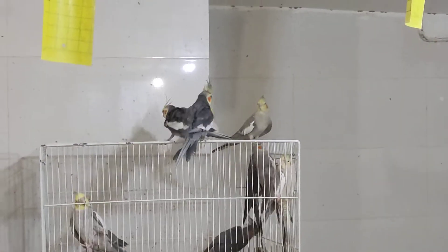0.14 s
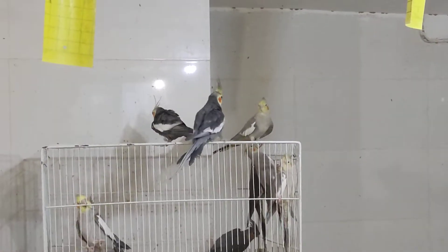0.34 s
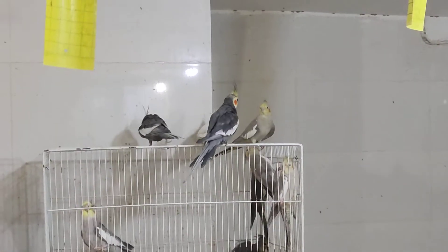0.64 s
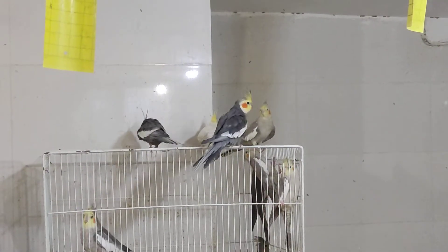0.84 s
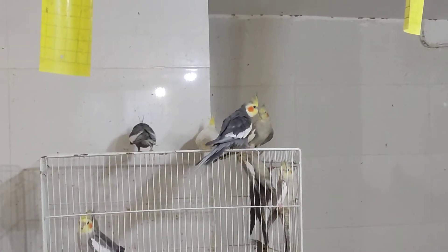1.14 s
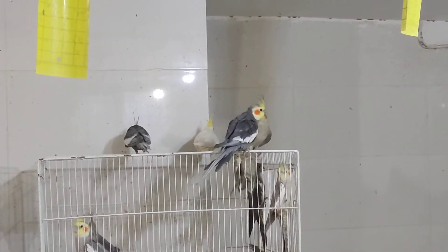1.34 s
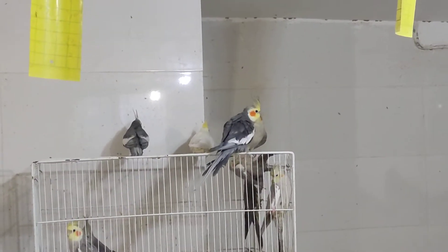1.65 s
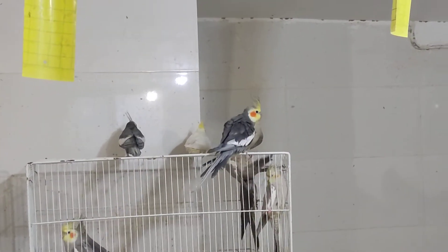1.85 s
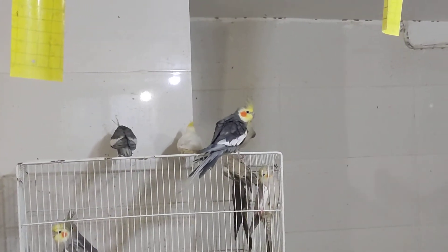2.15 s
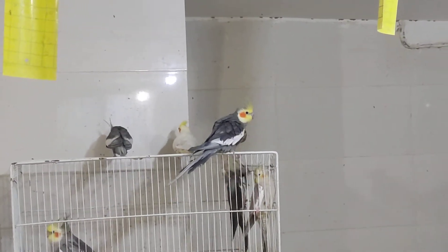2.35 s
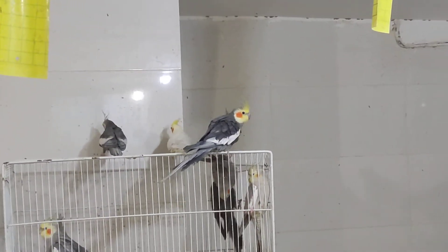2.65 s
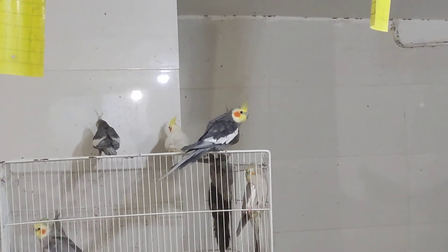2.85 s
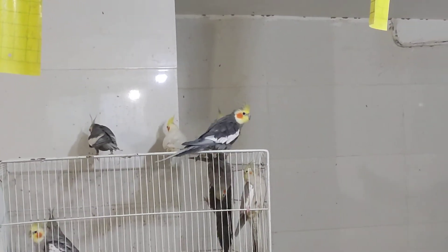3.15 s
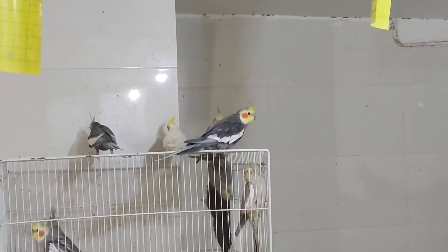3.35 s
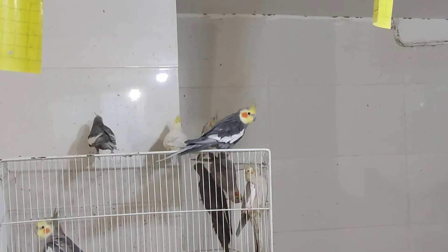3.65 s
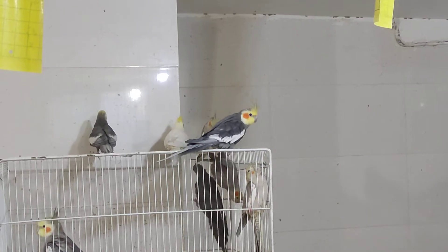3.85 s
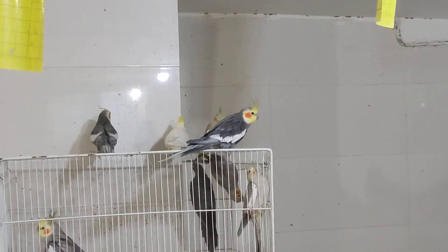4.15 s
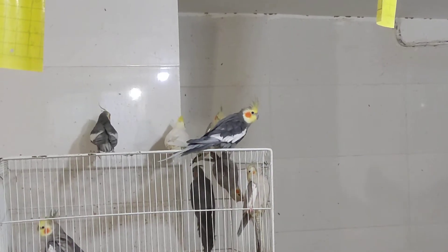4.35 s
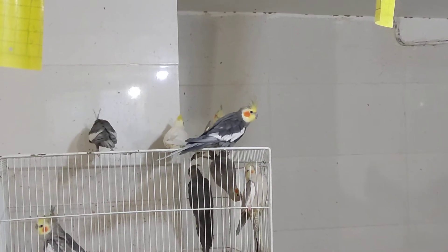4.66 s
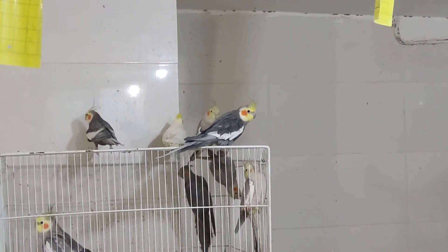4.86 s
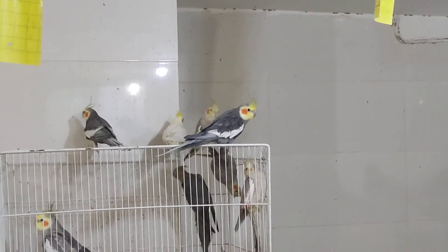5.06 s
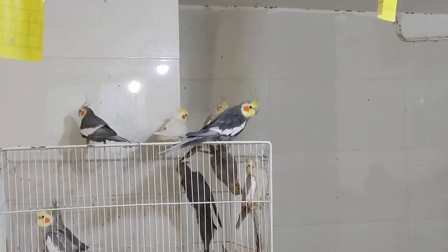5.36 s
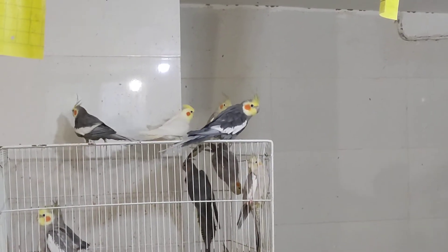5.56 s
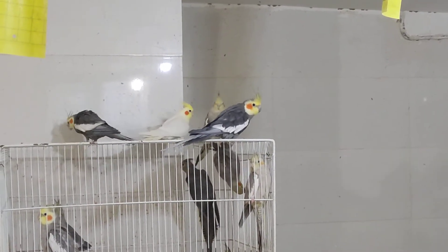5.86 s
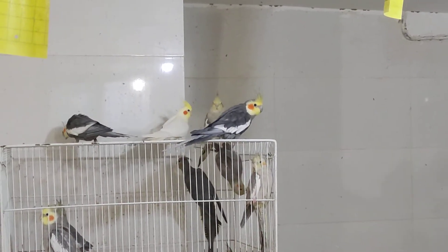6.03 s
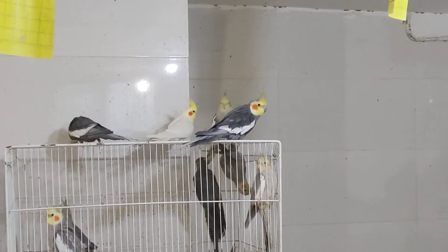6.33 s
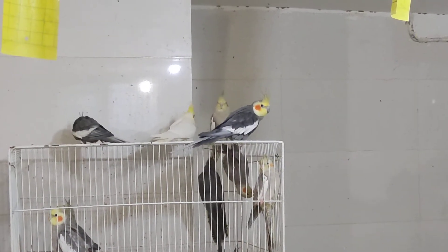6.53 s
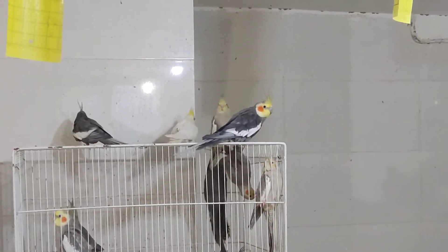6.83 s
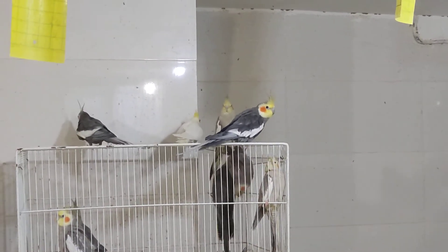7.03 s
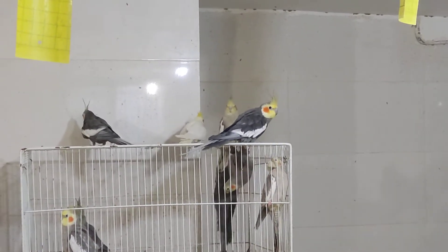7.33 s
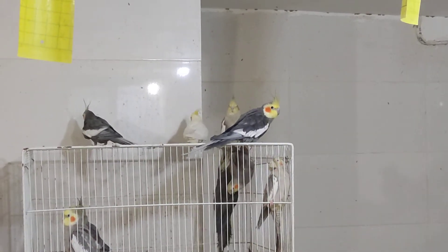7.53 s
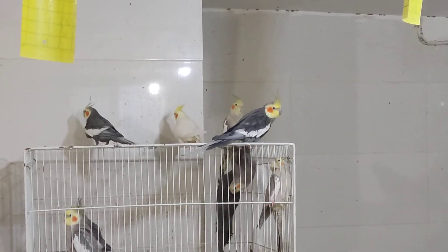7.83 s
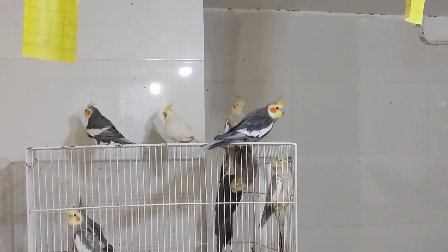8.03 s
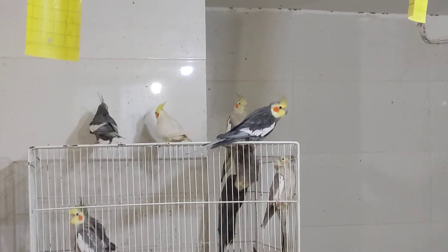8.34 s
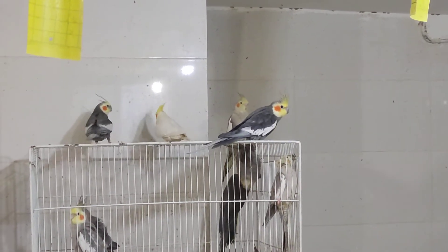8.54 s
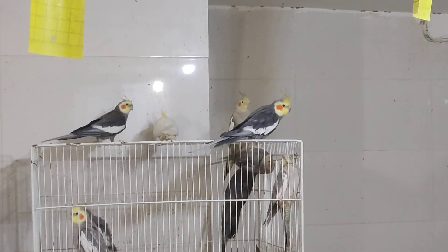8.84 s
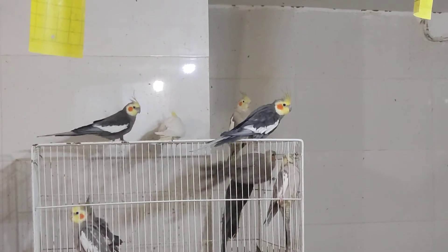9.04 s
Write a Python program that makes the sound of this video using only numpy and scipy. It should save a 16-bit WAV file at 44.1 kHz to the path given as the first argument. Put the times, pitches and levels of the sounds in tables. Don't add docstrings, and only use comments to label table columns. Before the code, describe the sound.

Small parrots rustle and tick on cage wire, then whistle and shriek in short bursts, ringing off bare tiles above a steady low fan.

```python
import sys
import numpy as np
from scipy import signal
from scipy.fft import rfft, irfft, next_fast_len
from scipy.io import wavfile
from scipy.ndimage import uniform_filter1d

SR = 44100
rng = np.random.default_rng(int(sys.argv[2]) if len(sys.argv) > 2 else 0)


def decibels_to_gain(level_db):
    exponent = np.asarray(level_db, float) / 20
    return 10 ** exponent


def waveform_to_disk(signal):
    frames = np.transpose(np.atleast_2d(signal))
    scaled = np.clip(frames, -1, 1) * 32767
    samples = np.round(scaled).astype(np.int16)
    wavfile.write(sys.argv[1], SR, samples)


N = 405279
PORT_GAP_S = 20 / 44100
SNAP = signal.butter(2, [5000, 13500], "bandpass", fs=SR, output="sos")
BODY = signal.butter(2, [2000, 6000], "bandpass", fs=SR, output="sos")


def curve(points, hz):
    f, value = np.transpose(points)
    return np.interp(np.log(hz + 1), np.log(f), value)


def level(x, db):
    return x * decibels_to_gain(db) / np.sqrt(np.mean(x ** 2))


def walk(rate, size):
    hold = max(int(SR / rate), 1)
    steps = np.repeat(rng.standard_normal(size // hold + 1), hold)
    return 1.373 * uniform_filter1d(uniform_filter1d(steps, hold), hold)[:size]


def add(out, x, s):
    i = int(s * SR)
    out[..., i:i + x.shape[-1]] += x[..., :max(N - i, 0)]


def diffuse(size, lead_s=0.0):
    hz = np.fft.rfftfreq(size, 1 / SR)
    a, b = rfft(rng.standard_normal((2, size)))
    alike = np.sinc(2 * hz * PORT_GAP_S)
    alike = alike * (1 - np.exp(-hz / 28.0))
    left = a * np.exp(-2j * np.pi * hz * lead_s)
    return hz, np.array([left, alike * a + np.sqrt(1 - alike ** 2) * b])


# frequency in Hz, density in dB per Hz.
AIR = [(13, -51.5), (22, -9), (38, -16), (51, -15), (70, -25), (103, -5), (124, -8), (142, -4.5), (171, -8),
       (264, -8.5), (1530, -23.5), (2620, -27.5), (6400, -33), (8850, -37.5), (14000, -43.5)]
# frequency in Hz, width in Hz, lift in dB.
AIR_LIFTS = [(666, 21, 7), (2500, 810, 7.5)]
# frequency in Hz, width in Hz, level in dB.
HUM = [(70.8, 7.6, -49.5), (139.3, 3.23, -42.5), (144.8, 2.78, -45), (228, 12.4, -54), (417, 8.12, -53)]


def fan():
    size = next_fast_len(N)
    hz, spec = diffuse(size, lead_s=0.00023)
    lift_db = sum(db / (1 + (2 * (hz - f) / width) ** 2) for f, width, db in AIR_LIFTS)
    air = level(irfft(spec * decibels_to_gain(curve(AIR, hz) + lift_db), size)[:, :N], -39)
    motor = 0
    for f, width, db in HUM:
        phase = 2 * np.pi * np.cumsum(f + 0.2967 * width * walk(4, N)) / SR
        motor = motor + level(np.sin(phase) * decibels_to_gain(2.2 * walk(8, N)), db)
    left_motor = np.roll(motor, int(PORT_GAP_S * SR))
    return air * decibels_to_gain(0.5 * walk(0.81, N)) + np.array([left_motor, motor])


# frequency in Hz, time to fall 60 dB in seconds.
ROOM_T60 = [(1500, 0.58), (2500, 0.56), (3400, 0.5), (4600, 0.52), (6500, 0.38), (9000, 0.26),
            (13000, 0.31)]


def room(x, lag_s, wet_db=0.0, gap_s=0.0045, build_s=0.0056):
    size = SR
    hz, spec = diffuse(size)
    t = np.arange(size) / SR
    wash = 0
    for k, (_, t60) in enumerate(ROOM_T60):
        share = curve([(f, float(j == k)) for j, (f, _) in enumerate(ROOM_T60)], hz)
        wash = wash + irfft(spec * share, size) * decibels_to_gain(-60 * t / t60)
    near_walls = 1 + 0.27 * np.exp(-t / 0.098)
    wash = wash * np.clip((t - gap_s) / build_s, 0, 1) * near_walls
    wash = wash * decibels_to_gain(wet_db) / np.sqrt(np.sum(wash ** 2) / 2)
    wash[0, int(max(lag_s, 0) * SR)] += 1
    wash[1, int(max(-lag_s, 0) * SR)] += 1
    return signal.fftconvolve(x[None], wash, axes=1)


# start in seconds, length in seconds, level in dB.
BOUTS = [(0.0, .3, -42.5), (0.606, .06, -42), (2.01, .1, -39.5), (2.416, .2, -46.5), (3.4, .05, -59),
         (4.53, .06, -45), (4.98, .05, -51.5), (6.347, 0.18, -48.5), (7.243, .25, -45.5)]


def stir_db():
    t = np.arange(N) / SR
    db = np.maximum(-43.5 - 4.5 * t, -56.5)
    for s, length, bout_db in BOUTS:
        swell = 78 * (s - t)
        calm = 37.5 * (t - s - length)
        db = np.maximum(db, bout_db - np.maximum(np.maximum(swell, calm), 0))
    return db


def feathers():
    out = 0
    stir = decibels_to_gain(stir_db())
    for perch in range(4):
        grains = rng.standard_normal(N) * decibels_to_gain(2.5 * rng.exponential(size=N) + 2.5 * walk(40, N))
        grains = level(signal.sosfilt(SNAP, grains), -17.5) + level(signal.sosfilt(BODY, grains), -20.5)
        out = out + room(grains * stir, lag_s=PORT_GAP_S * perch / 3, wet_db=9.5)
    return out[:, :N]


# time in seconds, peak in dB, body minus tick in dB.
TICKS = [(0.203, -28.5, -10.5), (0.3025, -26.5, -18), (0.6457, -28.5, -14.5), (1.355, -36.5, -7),
         (1.5763, -41, -6), (3.4012, -35.5, -9), (4.3779, -40, -11), (4.5177, -28, -26), (4.5266, -32, -5),
         (4.6598, -38, -10), (5.7222, -38.5, -16), (6.3644, -49, -7), (6.463, -36, -18), (7.175, -33, -32),
         (7.272, -30, -8), (7.3125, -12, -12), (7.3234, -43.5, -24), (7.4478, -21, -44),
         (7.511, -27, -11.5), (7.5462, -28.5, -15)]


def wire_ticks():
    dry, t = np.zeros(N), np.arange(600) / SR
    for s, db, body_db in TICKS:
        burst = rng.standard_normal(600) * t / 0.0015 * np.exp(-t / 0.0013)
        tick = signal.sosfilt(SNAP, burst) + decibels_to_gain(body_db + 9.5) * signal.sosfilt(BODY, burst)
        add(dry, decibels_to_gain(db + 7.5) * tick, s - 0.0005)
    return room(dry, lag_s=PORT_GAP_S, wet_db=6.5, gap_s=0.00062)[:, :N]


def whistle(table, flutter_db=0.5, fall_db=-3.5, rasp_db=-5.0, rattle_db=-0.5):
    s, *columns = np.transpose(table)
    t = s[0] + np.arange(int(0.36 * SR)) / SR
    size = len(t)
    hz, effort_db, second_db, high_db = (uniform_filter1d(np.interp(t, s, c), size=130) for c in columns)
    slide = np.clip(np.abs(np.gradient(np.log(hz))) * SR / 12, 0, 1)
    jitter = (0.005 + 0.04 * slide) * walk(400, size) + 0.005 * walk(90, size)
    phase = 2 * np.pi * np.cumsum(hz * (1 + jitter)) / SR
    tone = np.sin(phase) * decibels_to_gain(3 * slide * walk(600, size))
    tone += decibels_to_gain(second_db + (1.5 + 2.5 * slide) * walk(600, size)) * np.sin(2 * phase)
    for k in range(3, 9):
        partial_db = high_db + fall_db * (k - 2) + 2.9 * walk(700, size)
        tone += decibels_to_gain(partial_db) * np.sin(k * phase) * (k * hz < 15000)
    breath_band = signal.butter(2, [4500, 11000], "bandpass", fs=SR, output="sos")
    breath = signal.sosfilt(breath_band, rng.standard_normal(size))
    tone += decibels_to_gain(high_db + rasp_db) * breath * (1 + np.cos(phase))
    rattle_band = signal.butter(3, [1500, 3200], "bandpass", fs=SR, output="sos")
    rattle = signal.sosfilt(rattle_band, rng.standard_normal(size))
    tone += (decibels_to_gain(high_db + rattle_db) + decibels_to_gain(-21)) * rattle
    edges = np.clip(np.minimum(t - s[0], s[-1] - t) / 0.00077, 0, 1)
    return np.sqrt(2) * tone * edges * decibels_to_gain(effort_db + flutter_db * walk(149.5, size))


# pitch in Hz, level over the note in dB.
SECOND = [(1500, -6), (1800, 9), (2100, -2.5), (2400, -10.5), (3000, -20.5), (3400, -15.5)]
# pitch in Hz, level over the note in dB.
HIGH = [(1500, -2), (1800, -2.5), (2100, -7), (2400, -18.5), (3000, -20.5), (3400, -36)]


def voiced(tune, second_db=0.0, high_db=0.0):
    s, hz = np.array(tune)[:, :2].T
    tight_hz, slack_hz = 2980, 2060
    slack = np.clip((tight_hz - hz) / (tight_hz - slack_hz), 0, 1)
    tire_db = -6.5 * (s - s[0]) / (s[-1] - s[0])
    return np.column_stack([tune, curve(SECOND, hz) + second_db * slack, curve(HIGH, hz) + high_db + tire_db])


# time in seconds, pitch in Hz, effort in dB.
NASAL = [(2.0, 1548, -40), (2.02, 1680, -41.5), (2.08, 1813, -36.5), (2.125, 2016, -31),
         (2.15, 2267, -23.5), (2.21, 2416, -25.5), (2.26, 2295, -26.5), (2.31, 2020, -38)]
DOUBLE = [(2.75, 1442, -42.5), (2.79, 1997, -25), (2.83, 2890, -29), (2.85, 2850, -26), (2.87, 1930, -31),
          (2.89, 1880, -35.5), (2.925, 3015, -16), (2.955, 3130, -63)]
LONG = [(5.005, 1775, -29.5), (5.05, 2188, -25), (5.1, 2856, -15), (5.15, 3064, -15), (5.21, 3084, -15),
        (5.28, 2883, -19.5), (5.33, 2833, -18.5), (5.35, 2693, -15)]
UNDER = [(5.15, 1916, -19.5), (5.17, 1606, -36), (5.2, 2030, -23.5), (5.225, 2400, -20.5),
         (5.25, 1890, -33), (5.29, 1770, -45)]
CRACKED = [(5.925, 1287, -43), (5.95, 1556, -35), (5.985, 1860, -32), (6.0, 2743, -32.5), (6.05, 2900, -34),
           (6.08, 2780, -33)]
PIPED = [(6.16, 2820, -21.5), (6.18, 2943, -21), (6.22, 3050, -26), (6.285, 2898, -31)]
LOUD = [(8.153, 1780, -38), (8.16, 2020, -21), (8.175, 2147, -23.5), (8.185, 2605, -19.5),
        (8.197, 3184, -13.5), (8.22, 3447, -11.5), (8.27, 3250, -11.5), (8.295, 2995, -21),
        (8.315, 2500, -23)]
FALLING = [(8.848, 1663, -25.5), (8.87, 1833, -30.5), (8.89, 2232, -17), (8.907, 2840, -12),
           (8.97, 3057, -20.5), (9.04, 2977, -13), (9.07, 2270, -21), (9.1, 1762, -38.5), (9.16, 1708, -38)]
# tune, its second partial in dB, its higher partials in dB.
TUNES = [(NASAL, 4.1, 0.9), (LONG, -8, 0.833), (PIPED, -1, -1.4), (DOUBLE, -8.5, 0.5),
         (UNDER, -7.5, -0.3), (CRACKED, 2.273, 0.88), (FALLING, -7, -1.9), (LOUD, 7.7, 4.7)]


def tuned_calls():
    return [voiced(*tune) for tune in TUNES]


# start in seconds, climb in seconds, hold in seconds, top in Hz, effort in dB.
SHARP = [(3.432, .028, .105, 3400, -15), (5.328, .022, .11, 3300, -15)]
DRAWN = [(6.525, .088, .095, 3410, -21), (8.505, .068, .08, 3320, -18.5)]
# place of the top from 0 to 1, start in Hz, break in Hz; start, mid-climb, break,
# drop and end effort in dB under the hold; second and higher partials in dB.
SHARP_MANNER = (0.9, 1595, 2249.5, -24, -9.5, -4, -10, -29, 5, 2)
DRAWN_MANNER = (0.6, 1851, 2498.5, -13.5, -2, -2, -6, -16, -5, 0.4)


def shriek(row, manner):
    s, climb, hold, top, db = row
    place, start_hz, break_hz, start, mid, brk, drop, end, second_db, high_db = manner
    jump_s, drop_s, tail_s = 0.018, 0.016, 0.035
    lengths = [0, climb / 2, climb / 2, jump_s, place * hold, (1 - place) * hold, drop_s, tail_s]
    hz = [start_hz, (start_hz + break_hz) / 2, break_hz, 0.93 * top, top, 0.95 * top, 2454, 1891]
    effort_db = db + np.array([start, mid, brk, 0, 0, 0, drop, end])
    return voiced(np.transpose([s + np.cumsum(lengths), hz, effort_db]), second_db, high_db)


# start in seconds, rise in seconds, sag in seconds, top in Hz, effort in dB.
CHIRPS = [(6.02, 0.15, 0.015, 2388, -27), (6.561, .12, 0.013, 2224, -35.5), (7.681, .11, 0.1, 2573, -30.5),
          (7.975, 0.082, 0.045, 2414, -27.5)]


def chirp(s, rise, sag, top, db):
    times = s + np.array([0, 0.45 * rise, 0.72 * rise, rise, rise + 0.65 * sag, rise + sag])
    dwell_hz = 1518
    hz = [dwell_hz, 1.07 * dwell_hz, 0.82 * top, top, 0.87 * top, 0.54 * top]
    effort_db = db + np.array([-6, -6, 0, -1, -1, -6])
    return voiced(np.transpose([times, hz, effort_db]), second_db=-8, high_db=-3.5)


def birds():
    out = np.zeros((2, N))
    calls = tuned_calls()
    calls += [shriek(row, SHARP_MANNER) for row in SHARP]
    calls += [shriek(row, DRAWN_MANNER) for row in DRAWN]
    calls += [chirp(*row) for row in CHIRPS]
    for table in calls:
        lag_s = rng.uniform(0.39, 1) * PORT_GAP_S
        add(out, decibels_to_gain(-6.5) * room(whistle(table), lag_s=lag_s, wet_db=7.0), table[0][0])
    return out


def scene():
    return fan() + feathers() + wire_ticks() + birds()


def mask(x, near_db=-10, slope_db=-6.5, far_db=-46):
    spec = signal.stft(x, nperseg=2048)[2]
    power = np.sum(np.abs(spec[:, :1024]) ** 2, axis=0)
    bands = 10 * np.log10(power.reshape(64, 16, -1).mean(axis=1) + 1e-20)
    hide = np.tile(bands.max(axis=0) + far_db, (64, 1))
    for k in range(1, 4):
        hide[k:] = np.maximum(hide[k:], bands[:-k] + near_db + slope_db * k)
    keep = (bands > hide) | (np.arange(64)[:, None] < 7)
    spec[:, :1024] *= np.repeat(keep, 16, axis=0)
    return signal.istft(spec, nperseg=2048)[1][:, :N]


def band_limit(x):
    return signal.sosfilt(signal.butter(12, 14300, fs=SR, output="sos"), x)


# resonance in Hz, width in Hz, lift in dB, top octave in dB.
PORTS = [(10770, 2250, 8, -0.5), (8700, 2330, 15, -5)]


def record(dry):
    size = next_fast_len(N)
    hz = np.fft.rfftfreq(size, 1 / SR)
    lift = np.array([decibels_to_gain(db / (1 + (2 * (hz - f) / width) ** 2) + top_db * np.clip(hz / 3000 - 3, 0, 1))
                     for f, width, db, top_db in PORTS])
    wet = np.tanh(irfft(rfft(dry, size) * lift, size))
    mix = mask(irfft(rfft(wet) * (hz < 14300), size))
    return band_limit(mix)


dry = scene()
out = record(dry)
waveform_to_disk(out)
```